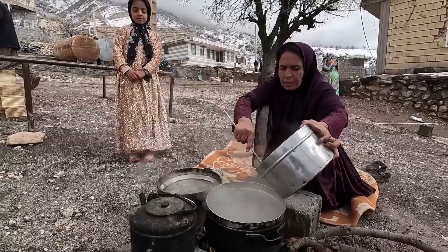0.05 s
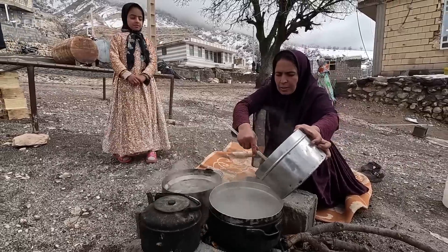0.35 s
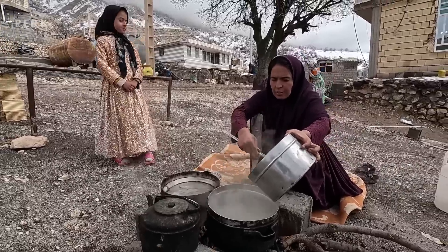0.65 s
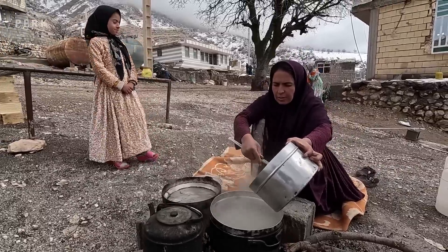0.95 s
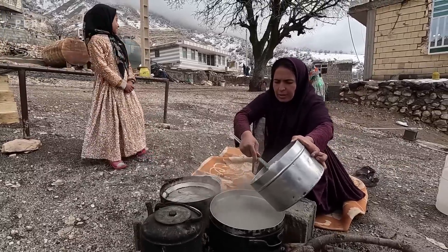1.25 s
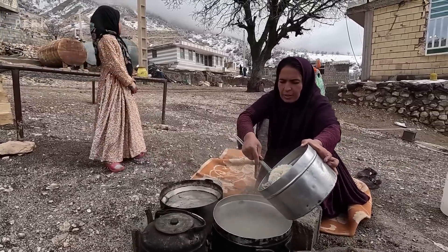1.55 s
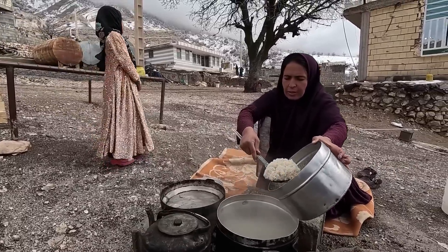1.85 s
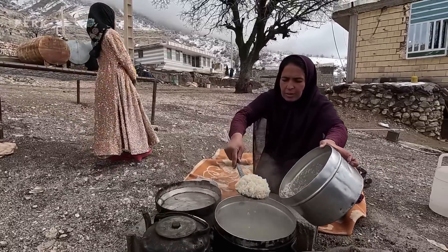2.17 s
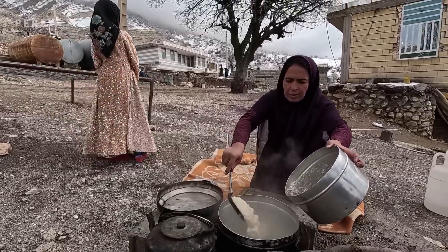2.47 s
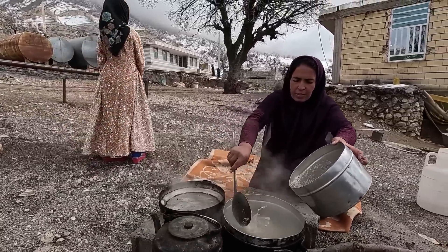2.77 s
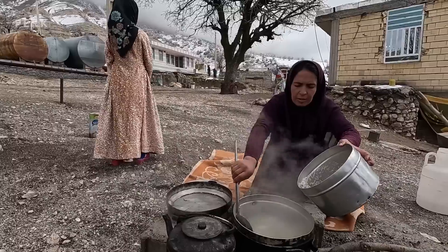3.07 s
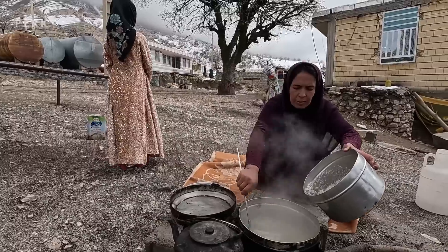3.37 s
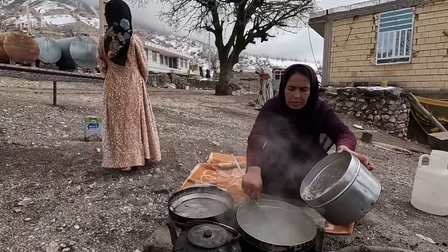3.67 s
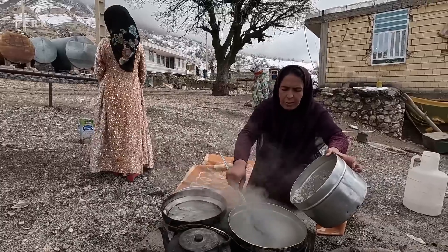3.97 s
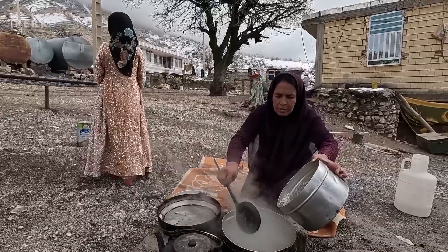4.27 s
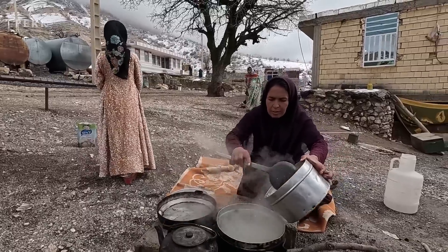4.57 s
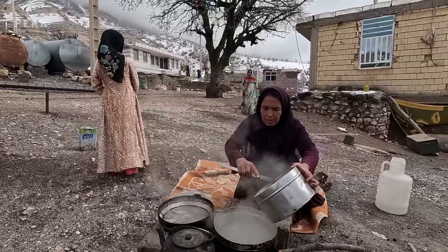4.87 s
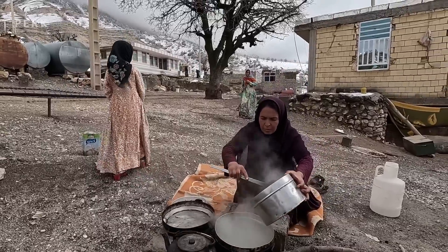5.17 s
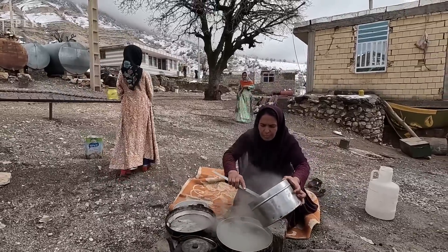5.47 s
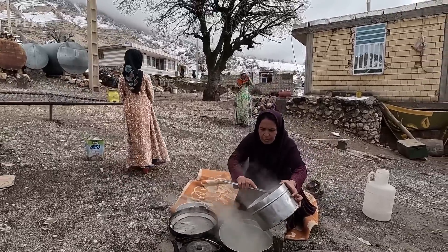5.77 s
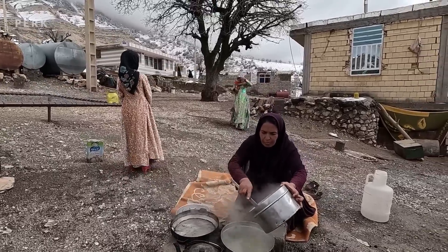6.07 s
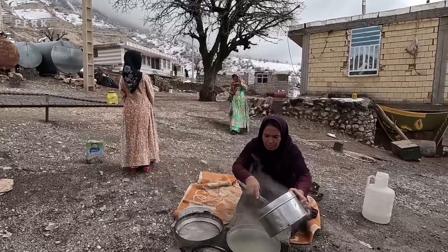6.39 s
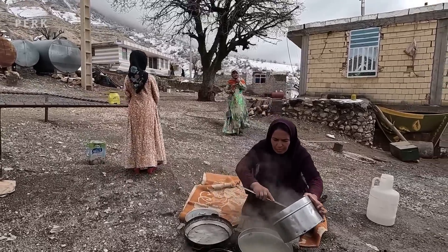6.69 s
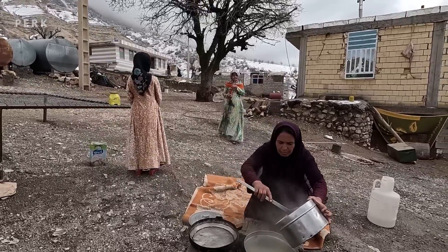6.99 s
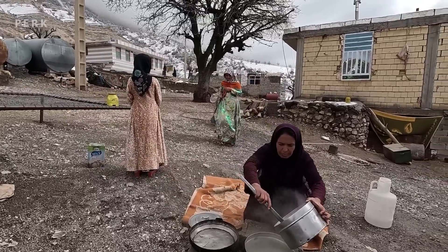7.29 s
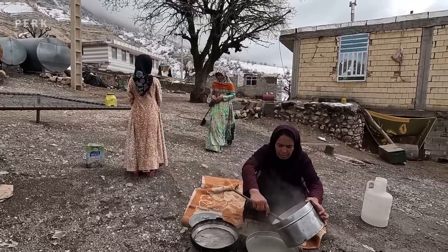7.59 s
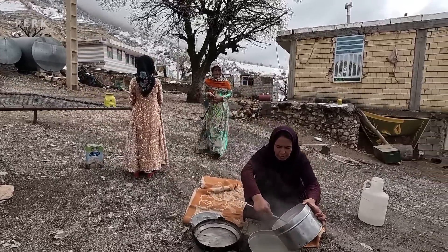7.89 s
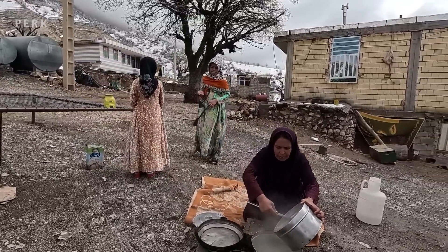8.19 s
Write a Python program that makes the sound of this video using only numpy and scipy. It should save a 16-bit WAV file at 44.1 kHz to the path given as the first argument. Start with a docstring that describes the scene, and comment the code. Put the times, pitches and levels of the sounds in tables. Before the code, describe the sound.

Outdoor cooking with gusty wind rumble: a ladle scraping and clanking in a metal pot, soft simmering, faint fire snaps and a distant goat.

```python
"""Cooking in a village yard. From the start a metal ladle scrapes a hand-held aluminium pot by stick-slip,
a cauldron simmers over a crackling wood fire, and wind rumbles on the microphone. Wet lumps plop and
steam sizzles; at 2.5 s rice slides hissing into the cauldron. At 2.7 s a goat bleats some way off and
the ladle starts to knock. Gusts peak at 3.5-4.2 s. Hard knocks and more scraping follow from 4.8 s,
and the goat bleats again at 8.1 s."""
import sys
import numpy as np
from scipy import signal
from scipy.fft import rfft, irfft, next_fast_len
from scipy.io import wavfile
from scipy.ndimage import uniform_filter1d, map_coordinates

SR = 44100
rng = np.random.default_rng(int(sys.argv[2]) if len(sys.argv) > 2 else 0)


def wav_out(sig):
    """Save sig, one row per channel (or a flat mono array), as 16-bit PCM at SR to the path in sys.argv[1]."""
    wavfile.write(sys.argv[1], SR, np.round(np.clip(np.atleast_2d(sig).T, -1, 1) * 32767).astype(np.int16))


N = 372204
TIME = np.arange(N) / SR

# ladle pressure, one curve per stroke: t/s, bottom/dB, wall/dB
LADLE_STROKES = [
    [(0.0, -34, -30), (0.04, -38.5, -30.5), (0.1, -34, -34), (0.156, -41, -38.5), (0.215, -33.5, -36.5),
     (0.265, -39, -44.5), (0.334, -40, -54), (0.35, -42, -52)],
    [(0.35, -40, -52), (0.44, -39.5, -51.5), (0.484, -31, -44), (0.506, -35, -40), (0.602, -36, -40.5),
     (0.622, -40, -43.5), (0.7, -44.5, -52), (0.92, -56, -66)],
    [(5.998, -54, -45), (6.053, -35.5, -34), (6.085, -51, -38.5), (6.099, -34, -32.5), (6.231, -39, -31),
     (6.265, -44, -40.5), (6.28, -56, -57), (6.32, -57, -49.5)],
    [(6.64, -31, -32.5), (6.682, -46, -31.5), (6.715, -44, -31), (6.75, -35, -36), (6.79, -24, -36.5),
     (6.814, -21.5, -29.5), (6.836, -31, -38.5), (6.868, -20, -35.5), (6.89, -51, -39), (6.93, -47, -60)],
    [(7.25, -34.5, -38), (7.368, -37.5, -29), (7.428, -42, -46), (7.604, -34, -41), (7.682, -36, -40.5),
     (7.788, -40.5, -51), (7.81, -55, -72)],
    [(7.81, -49.5, -62.5), (7.94, -37.5, -42), (7.99, -41.5, -58), (8.082, -44, -61), (8.106, -50, -42),
     (8.2, -50, -83)],
]
# short even flicks: t/s, length/s, bottom/dB, wall/dB
LADLE_FLICKS = [(4.948, 0.075, -31, -34), (5.055, 0.02, -20, -32.5), (5.461, 0.093, -36.5, -42.5),
                (5.543, 0.069, -29.5, -36)]
# edge catching on the wall: t/s, length/s, level/dB
EDGE_CATCHES = [(0.026, 0.033, -30.5), (0.058, 0.021, -33.5), (6.61, 0.016, -36), (6.665, 0.01, -29.5),
                (6.685, 0.0059, -27), (6.725, 0.0045, -30), (6.734, 0.013, -26.5), (6.777, 0.003, -25.5)]
# pot tones, shifting with ladle place and pressure: t/s, bottom/Hz, hollow/Hz, lowest wall mode/Hz
POT_TONES = [(0, 470, 1005, 1497), (0.348, 490, 900, 1300), (.56, 506, 966, 1405), (5.001, 525, 1000, 1402),
             (6.24, 476, 1065, 1531), (6.681, 518, 961, 1596), (6.869, 535, 1056, 1412),
             (7.35, 520.4, 1020, 1434), (7.62, 500, 926, 1532), (7.948, 478.5, 1170, 1458)]
# thin wall, damped by hand and rice: f/Hz, width/Hz, level/dB
WALL_MODES = [(1440, 103, 1.5), (1648, 220, 2.5), (1910, 500, 1), (2476, 300, 0), (2887, 400, -2.5),
              (3540, 1140, -10.5)]
# gritty treble of the wall: f/Hz, width/Hz, level/dB
GRIT_MODES = [(4150, 770, 0.5), (4810, 710, 3.5), (5440, 400, 4), (6550, 1030, 0), (7610, 890, -2),
              (9650, 1420, -9)]
# pot at the two microphone ports: f/Hz, left-right/dB
POT_PAN = [(500, -0.88), (1500, -2.1), (4200, -1.7), (12000, 1.5)]
# phase between the ports: f/Hz, left lead/rad
POT_LEAD = [(400, 0.053), (1600, -0.3), (3200, -0.81), (5500, -0.5), (12000, -0.52)]

# steady cauldron hiss: t/s, level/dB
SIMMER_LEVEL = [(0, -58), (3, -67), (4.5, -66.5), (5.35, -65.5), (5.84, -56.5), (6.4, -66), (7.1, -82),
                (8.44, -52)]
# hiss swells as rice is dug out or stirred in: centre/s, length/s, level/dB
STIR_SWELLS = [(1.298, 0.32, -52.5), (2.02, 0.28, -55.5), (3.46, 0.5, -59), (4.02, 0.0082, -51),
               (4.117, 0.16, -59), (4.159, 0.022, -43.5), (5.12, 0.15, -54.5), (6.966, 0.28, -58.5),
               (8.376, 0.49, -71)]
# fizz of tiny bubbles: f/Hz, level/dB
FIZZ_SPECTRUM = [(400, -13), (800, -1), (1300, 5), (2200, 3), (4000, -1), (7500, -1), (11500, -12),
                 (15000, -45)]
# quiet yard: f/Hz, level/dB
YARD_SPECTRUM = [(30, 18.5), (150, 15.5), (300, 6), (550, 7), (820, -6), (1300, 5.5), (2200, -0.5),
                 (4000, -10.5), (7500, -66)]

# steady wind: t/s, rumble/dB
WIND_LEVEL = [(0, -45), (.42, -47), (.55, -38.5), (1.5, -34.5), (1.75, -32), (2.1, -38.5), (2.9, -36.5),
              (3.38, -33.5), (3.65, -26.5), (4.15, -24.5), (4.55, -37.5), (5.4, -36), (5.8, -47),
              (6.55, -56), (6.7, -47), (7.2, -43.5), (7.7, -41.5), (8.44, -35)]
# single gusts: centre/s, length/s, rumble/dB, buffet/dB
WIND_GUSTS = [(0.546, 0.083, -29.5, -65), (0.742, 0.015, -24, -46.5), (1.125, 0.042, -33.5, -41.5),
              (1.72, 0.063, -25, -60), (2.248, 0.12, -29, -68), (3.048, 0.033, -21, -37.5),
              (3.471, 0.037, -18.5, -23.5), (3.613, 0.013, -15.5, -16), (3.758, 0.17, -23.5, -25),
              (4.087, 0.13, -23, -23), (4.3, 0.072, -22.5, -31.5), (4.706, 0.0099, -14.5, -57),
              (4.753, 0.021, -18.5, -31), (6.806, 0.27, -41.5, -45.5), (8.075, 0.028, -25, -34),
              (8.363, 0.046, -21.5, -32)]
# sudden slaps of wind: t/s, level/dB
WIND_SLAPS = [(3.462, -22), (3.619, -27.5), (3.696, -17.5), (3.811, -21), (4.127, -26)]
# windward side: t/s, left-right/dB
WIND_PAN = [(0, -1), (.6, -6.5), (1.15, 3.5), (1.7, -5), (3.05, -3), (3.5, -9), (5.3, -3.5), (7.5, 0.5),
            (8.4, -6.5)]
# deep wind rumble: f/Hz, level/dB
RUMBLE_SPECTRUM = [(12, -5), (28, 9.5), (55, 2), (95, -1.5), (130, -11), (200, -17.5), (400, -105)]
# buffeting above the rumble: f/Hz, level/dB
BUFFET_SPECTRUM = [(60, -61), (110, 2), (160, 0.5), (250, -5.5), (400, -18), (600, -26.5), (900, -52),
                   (2000, -68), (5000, -99)]

# fire snaps and small taps: t/s, mid/dB, treble/dB
FIRE_SNAPS = [(0.454, -53.5, -66), (1.328, -55.5, -60.5), (1.399, -59, -66), (1.606, -59.5, -70),
              (1.772, -57, -54), (2.276, -69, -65), (2.355, -50.5, -50), (2.414, -56.5, -49),
              (2.824, -55, -51), (2.937, -52, -54.5), (3.06, -49, -57), (3.8, -56, -61.5),
              (4.012, -56.5, -75), (4.27, -67, -61.5), (4.371, -67, -71), (5.282, -57, -59),
              (5.785, -59.5, -74), (7.072, -57, -69)]
# wet lumps landing: t/s, f/Hz, level/dB
LUMP_PLOPS = [(.717, 1440, -42), (1.132, 1150, -48), (1.284, 3500, -48), (2.564, 2180, -43.5),
              (2.601, 550, -44), (2.673, 2150, -42.5), (2.832, 710, -46.5), (3.056, 613, -40.5),
              (5.235, 530, -49)]
# steam jets: centre/s, length/s, f/Hz, level/dB
STEAM_JETS = [(0.854, 0.047, 7700, -53.5), (3.213, 0.054, 8800, -59)]
# rice sliding into the cauldron: t/s, level/dB
RICE_LEVEL = [(2.49, -51), (2.51, -44), (2.58, -45), (2.66, -41.5), (2.75, -46), (2.805, -40), (2.84, -51),
              (2.9, -51), (2.96, -75)]
# patter of wet grains: f/Hz, level/dB
RICE_SPECTRUM = [(300, 2), (900, 2.5), (2200, 3.5), (6500, 5.5), (9500, -0.5), (12500, -9), (15000, -31)]

# one curve per bleat: t/s, pitch/Hz, level/dB, roughness/0-1, low formant lift/dB, high formant lift/dB
GOAT_BLEATS = [
    [(2.68, 150.1, -50.5, 0.42, -4, -2), (2.78, 159.2, -41, 0.56, -4, -3.5),
     (2.86, 165, -43.5, 0.3, 4.5, -4), (2.94, 168.2, -43.5, 0.05, 1, 0),
     (3.04, 170.2, -43.5, 0.23, -4, 2.5), (3.12, 170.2, -40.5, 0.32, -7, -5),
     (3.36, 168.9, -41, 0.34, 5.5, -12), (3.43, 168, -41, 0.7, 1, -6), (3.52, 165.5, -38, 0.67, 3, 0.5),
     (3.61, 163.5, -39.5, 0.86, 4, -2), (3.69, 158, -49.5, 0.46, 3, 1), (3.9, 139.3, -57, 0.49, 6, -3)],
    [(8.13, 159.3, -47, 0.85, -7, -3), (8.22, 165.5, -45, 0.65, 4, -6), (8.3, 171.4, -47.5, 0.32, 10, -1),
     (8.44, 169.8, -43, 0.3, 2, -7)],
]
# throat response: f/Hz, level/dB
THROAT_SPECTRUM = [(170, 4), (340, -5), (510, 3), (600, 12), (680, 6), (850, -29), (1150, -4), (1350, -1),
                   (1520, 6.5), (1680, 17), (1750, 7), (1900, 4.5), (2200, 2.5), (2400, 3.5), (2550, 1),
                   (2850, -6.5), (3500, -20)]
# main throat resonances, lifted as the mouth works: f/Hz, width/Hz
THROAT_FORMANTS = [(640, 180), (1690, 410)]
# hoarse breath: f/Hz, level/dB
RASP_SPECTRUM = [(350, -14), (600, 26.5), (900, 14.5), (1350, 28), (1700, 4), (2300, 6), (2900, 16),
                 (3800, 15), (6000, -35)]

# ladle blows: t/s, bottom/dB, hollow/dB, wall/dB, clank/Hz
LADLE_KNOCKS = [(2.781, -39, -42.5, -29, 2000), (2.879, -43.5, -43, -36.5, 1750),
                (3.282, -39, -34, -31, 1450), (4.834, -33.5, -46, -25, 1950),
                (4.845, -26, -38, -23.5, 2040), (4.904, -25, -29.5, -31.5, 1510),
                (5.026, -26, -30, -41, 2070), (5.057, -36, -24.5, -32.5, 1800),
                (5.077, -25, -27, -46.5, 1790), (5.111, -30, -36, -40, 1820),
                (5.42, -32.5, -41, -25.5, 1840), (5.474, -20.5, -19, -23.5, 1680),
                (5.935, -43.5, -43, -28, 1800), (5.973, -19, -31, -36.5, 1680),
                (6.541, -36, -39, -24.5, 1990), (6.589, -23.5, -27.5, -30.5, 2480),
                (6.632, -31.5, -27.5, -32.5, 1450), (6.703, -24, -43, -26.5, 2000),
                (6.785, -23.5, -23, -38, 2020), (6.844, -27, -24, -34, 1970),
                (7.231, -31.5, -43, -24, 1810), (7.771, -46, -39, -43, 1900)]
# free rim, ringing after a blow: f/Hz, width/Hz, level/dB
RIM_MODES = [(1900, 28, -11), (2939, 16, -5), (3270, 16, 2)]

BOTTOM_WIDTH_HZ, HOLLOW_WIDTH_HZ = 119, 224
TOUCH_DB = -31.5  # ordinary ladle pressure


def from_db(db):
    """Decibels to gain."""
    return 10 ** (np.asarray(db) / 20)


def unit_rms(x):
    """Scale to unit power."""
    return x / np.sqrt(np.mean(x ** 2) + 1e-20)


def unit_energy(x):
    """Scale to unit energy."""
    return x / np.sqrt(np.sum(x ** 2) + 1e-20)


def in_time(rows):
    """Columns of a curve, per sample."""
    times, *columns = np.transpose(rows)
    return [np.interp(TIME, times, column) for column in columns]


def during(rows, fade_s):
    """Ramped gate over the span of a curve."""
    return np.clip(np.minimum(TIME - rows[0][0], rows[-1][0] - TIME) / fade_s + .5, 0, 1)


def swell(centre_s, length_s):
    """Bell envelope; length is the half-power width."""
    return 2 ** (-2 * ((TIME - centre_s) / length_s) ** 2)


def burst(t, length_s, attack_s, release_s):
    """Attack, hold, release."""
    return np.clip(t / attack_s, 0, 1) * np.exp(-np.clip(t - length_s, 0, 1) / release_s)


def add(track, start_s, sound):
    """Mix a sound into a track."""
    i = max(round(start_s * SR), 0)
    track[i:i + len(sound)] += sound[:N - i]


def noise(size=N):
    """White noise."""
    return rng.standard_normal(size)


def drift(rate_hz):
    """Slow random motion, unit RMS."""
    hop, settle = 40, 2000
    r = np.exp(-2 * np.pi * rate_hz * hop / SR)
    slow = signal.lfilter([1], [1, -2 * r, r * r], noise(N // hop + settle + 2))[settle:]
    return np.interp(np.arange(N) / hop, np.arange(len(slow)), unit_rms(slow))


def grains(per_s, spread_db):
    """Random clicks of uneven size."""
    sizes = from_db(spread_db * np.minimum(rng.exponential(1, N), 4)) * rng.choice([-1, 1], N)
    return sizes * (rng.random(N) < per_s / SR)


def stereo(draw, correlation):
    """Two partly correlated channels."""
    mid = np.sqrt((1 + correlation) / 2) * draw()
    side = np.sqrt((1 - correlation) / 2) * draw()
    return np.array([mid + side, mid - side])


def at_hz(spectrum, hz):
    """Interpolate on a log-frequency axis."""
    points_hz, values = np.transpose(spectrum)
    return np.interp(np.log(np.maximum(hz, 1)), np.log(points_hz), values)


def colour(x, spectrum):
    """Apply a spectrum; unit RMS."""
    size = next_fast_len(N)
    gain = from_db(at_hz(spectrum, np.fft.rfftfreq(size, 1 / SR)))
    return unit_rms(irfft(rfft(x, size) * gain, size)[..., :N])


def patchy(x, depth_db, rate_hz):
    """Each octave fades in and out on its own; unit RMS."""
    size, octaves_hz = next_fast_len(N), 375 * 2 ** np.arange(7)
    hz, spectrum = np.fft.rfftfreq(size, 1 / SR), rfft(x, size)
    out = 0
    for row in np.eye(len(octaves_hz)):
        share = np.interp(np.log(hz + 1), np.log(octaves_hz), row)
        out += irfft(spectrum * share, size)[..., :N] * from_db(depth_db * drift(rate_hz))
    return unit_rms(out)


def band(x, low_hz, high_hz, order=2):
    """Causal band-pass."""
    sos = signal.butter(order, [low_hz, high_hz], "band", fs=SR, output="sos")
    return signal.sosfilt(sos, x + 1e-18)


def resonance(x, hz, width_hz):
    """Steep resonance; the centre may move."""
    carrier = np.exp(2j * np.pi * np.cumsum(hz * np.ones(len(x))) / SR)
    r = np.exp(-np.pi * width_hz / SR)
    return np.real(carrier * signal.lfilter([(1 - r) ** 2], [1, -2 * r, r * r], x / carrier + 1e-18))


def modes(x, table):
    """Parallel modes of alternating sign."""
    out = 0
    for k, (hz, width_hz, db) in enumerate(table):
        r = np.exp(-np.pi * width_hz / SR)
        gain = (-1) ** k * from_db(db) * (1 - r * r) / 2
        poles = [1, -2 * r * np.cos(2 * np.pi * hz / SR), r * r]
        out += gain * signal.lfilter([1, 0, -1], poles, x + 1e-18)
    return out


def pot_voices(bowl_force, edge_force, bottom_hz, hollow_hz, wall_hz):
    """The ladle's bowl drives bottom and hollow; its edge drives wall and grit."""
    bottom = resonance(bowl_force, bottom_hz, BOTTOM_WIDTH_HZ)
    hollow = resonance(bowl_force, hollow_hz, HOLLOW_WIDTH_HZ)
    wall = band(modes(edge_force, WALL_MODES), 1260, 5400)
    read_at = np.cumsum(wall_hz * np.ones(len(wall)) / WALL_MODES[0][0])  # retune by resampling
    wall = map_coordinates(wall, [read_at], order=1, mode="mirror")
    grit = band(modes(edge_force, GRIT_MODES), 2500, 12800)
    return bottom, hollow, wall, grit


def grit_db(wall_db):
    """Grit grows faster than the pressure on the wall."""
    return TOUCH_DB - 8.5 + 1.22 * (wall_db - TOUCH_DB)


def ladle_pressure_db():
    """Strokes, flicks and catches bearing on bottom and wall."""
    gain = sum(during(stroke, 0.0037) * from_db(in_time(stroke)) for stroke in LADLE_STROKES)
    for start_s, length_s, *db in LADLE_FLICKS:
        gain += from_db(db)[:, None] * burst(TIME - start_s, length_s, attack_s=0.025, release_s=0.008)
    catches = np.zeros(N)
    for start_s, length_s, db in EDGE_CATCHES:
        envelope = burst(TIME[:SR // 10], length_s, attack_s=0.00039, release_s=0.004)
        add(catches, start_s, from_db(db) * envelope)
    return 20 * np.log10(np.array([gain[0], np.hypot(gain[1], catches)]) + 1e-9)


def stick_slip(judder_hz=109.9, depth_db=7):
    """Each slip jerks, then decays until the edge catches again, at an uneven rate."""
    cycles = np.cumsum(judder_hz * from_db(3 * drift(40))) / SR
    return from_db(-depth_db * (cycles % 1))


def bending_waves(force, lap_s=.0042, travel=0.1065, return_gain=0.4):
    """Waves circle the wall and return; the paths change as the ladle moves."""
    out = force
    for share in 1, .618, .382:
        delay = lap_s * share * SR * (1 + travel * drift(2.59))
        out = out + return_gain * map_coordinates(out, [np.arange(N) - delay], order=1)
    return out


def scraping(wander=.04, flicker_db=2.5, trims_db=(-.5, -1, -.5, -1)):
    """The bowl rubs the bottom, the edge slips along the wall; the tones glide with the ladle."""
    bottom_db, wall_db = ladle_pressure_db()
    drive_db = 0.63 * bottom_db + 0.37 * wall_db
    hollow_db = TOUCH_DB - 2 + 1.1 * (drive_db - TOUCH_DB)
    levels_db = bottom_db, hollow_db, wall_db, grit_db(wall_db)
    tones_hz = [hz * (1 + wander * drift(6)) for hz in in_time(POT_TONES)]
    jerks = stick_slip()
    bowl, edge = (jerks * grains(per_s=1300, spread_db=2) for _ in range(2))
    voices = pot_voices(bowl, bending_waves(edge), *tones_hz)
    out = 0
    for voice, db, trim_db in zip(voices, levels_db, trims_db):
        steady = voice / np.sqrt(uniform_filter1d(voice ** 2, size=900) + 1e-12)  # even hand pressure
        out += steady * from_db(db + trim_db + flicker_db * drift(16.8))
    return out


def place_pot(x):
    """Close by, slightly right: level and phase differ between the ports."""
    size = next_fast_len(N + SR // 10)
    hz = np.fft.rfftfreq(size, 1 / SR)
    left = from_db(at_hz(POT_PAN, hz) / 2) * np.exp(.5j * at_hz(POT_LEAD, hz))
    return irfft(rfft(x, size) * np.array([left, 1 / left]), size)[:, :N]


def yard_echo(x, t60_s, first_s=0.01):
    """Sparse, dull scatter off stone walls and ground, different per channel."""
    t = TIME[:SR // 2]
    reflections = noise((2, len(t))) * (rng.random((2, len(t))) < .03) * (t > first_s)
    response = band(reflections * from_db(-60 * t / t60_s), 630, 3000, order=1)
    return signal.fftconvolve(x[None], np.sqrt(2) * unit_energy(response), axes=1)[:, :N]


def bubbles(per_s, low_hz, high_hz, cycles):
    """Random bursts, each ringing a few cycles at one of 12 pitches."""
    bursts, pitch_index = grains(per_s, 5), rng.integers(0, 12, N)
    return unit_rms(sum(modes(bursts * (pitch_index == k), [(hz, hz / cycles, 0)])
                        for k, hz in enumerate(np.geomspace(low_hz, high_hz, 12))))


def simmering(pops_db=-9, rustle_db=-0.5, ticks_db=-67.5):
    """Tiny bubbles hiss and pop, sticky clumps rustle; fire and stirring tick faintly."""
    stir_power = sum((from_db(db) * swell(centre_s, length_s)) ** 2
                     for centre_s, length_s, db in STIR_SWELLS)
    gain = np.sqrt(from_db(in_time(SIMMER_LEVEL)[0]) ** 2 + stir_power)
    fizz = colour(stereo(lambda: grains(12000, 2.5), .6), FIZZ_SPECTRUM)
    fizz = patchy(fizz, depth_db=1.7, rate_hz=14)
    pops = bubbles(130, 1100, 3600, cycles=6)
    ticks = band(bubbles(45, 1500, 7000, cycles=5), 1000, 7500)
    clumps = grains(2500, 3) * from_db(2.5 * drift(40))
    rustle = patchy(band(clumps, 1400, 6000), depth_db=3.5, rate_hz=25)
    cauldron = fizz + from_db(pops_db) * pops + from_db(rustle_db) * rustle
    return gain * cauldron + from_db(ticks_db) * ticks


def yard_air(level_db=-55.5):
    """Steady low background of the yard."""
    return from_db(level_db) * colour(stereo(noise, 0.58), YARD_SPECTRUM)


def wind_gains(breeze_db=-36, buffet_offset_db=-14.5):
    """Rumble and buffet gains, gusts included; buffeting catches up above a breeze."""
    rumble_db, = in_time(WIND_LEVEL)
    buffet_db = rumble_db + buffet_offset_db + np.maximum(rumble_db - breeze_db, 0)
    power = from_db([rumble_db, buffet_db]) ** 2
    for centre_s, length_s, *db in WIND_GUSTS:
        power += (from_db(db)[:, None] * swell(centre_s, length_s)) ** 2
    return np.sqrt(power)


def wind(slap_decay_s=0.01):
    """Eddies hit the ports in lumps, mostly on one side; the hardest slap."""
    lumps = unit_rms(from_db(5 * np.tanh(.8 * drift(22))))
    out = 0
    for spectrum, gain in zip((RUMBLE_SPECTRUM, BUFFET_SPECTRUM), wind_gains()):
        eddies = colour(stereo(noise, 0.91), spectrum)
        local_rms = np.sqrt(uniform_filter1d(np.mean(eddies ** 2, axis=0), size=3500))
        out += gain * lumps * eddies / local_rms
    slap_envelope = np.zeros(N)
    for start_s, db in WIND_SLAPS:
        add(slap_envelope, start_s, from_db(db) * np.exp(-TIME[:SR // 8] / slap_decay_s))
    slaps = slap_envelope * unit_rms(band(noise(), 183, 480, order=3))
    out += band(slaps, 79, 910)  # soft air has no click
    pan_db, = in_time(WIND_PAN)
    sides = from_db([pan_db / 2, -pan_db / 2])
    return out * sides / np.mean(sides, axis=0)


def snapping(crack_s=0.003, tail_s=0.018, tail_db=-23, level_window_s=0.14):
    """Dry fire cracks and taps, hardly ringing."""
    out, t = np.zeros(N), TIME[:SR // 16]
    envelope = np.exp(-t / crack_s) + from_db(tail_db) * np.exp(-t / tail_s)
    for start_s, mid_db, treble_db in FIRE_SNAPS:
        crack = noise(len(t)) * envelope
        mid = from_db(mid_db) * unit_energy(band(crack, 1320, 3070))
        treble = from_db(treble_db) * unit_energy(band(crack, 4250, 7630, order=3))
        add(out, start_s, (mid + treble) * np.sqrt(level_window_s * SR))
    return out


def plopping(length_s=0.0017, attack_s=0.0011, release_s=0.011):
    """Each wet lump traps an air pocket that rings briefly and dully."""
    out, t = np.zeros(N), TIME[:SR // 16]
    for start_s, hz, db in LUMP_PLOPS:
        impact = noise(len(t)) * burst(t, length_s, attack_s, release_s)
        pocket = unit_energy(resonance(impact, hz, width_hz=0.47 * hz))
        add(out, start_s, from_db(db) * pocket * np.sqrt((length_s + release_s) * SR))
    return out


def sizzling(width_hz=1800):
    """Narrow steam jets hiss briefly."""
    return sum(from_db(db) * swell(centre_s, length_s) * unit_rms(resonance(noise(), hz, width_hz))
               for centre_s, length_s, hz, db in STEAM_JETS)


def sliding_rice(froth_db=-4, lumps_db=3):
    """Wet grains fizz on landing and drag small bubbles under."""
    level_db, = in_time(RICE_LEVEL)
    patter = colour(stereo(lambda: grains(14000, 2.5), 0.8), RICE_SPECTRUM)
    froth = from_db(froth_db) * bubbles(1500, 1800, 8000, cycles=7)
    gain = during(RICE_LEVEL, .01) * from_db(level_db + lumps_db * drift(32))
    return gain * unit_rms(patter + froth)


def goat(wobble=0.0034, jitter=0.025, flicker_db=2):
    """Throat buzz under swelling formants; roughness breaks it into a rasp, weak overtones first."""
    pitch_hz, level_db, rough, *lifts_db = in_time([row for bleat in GOAT_BLEATS for row in bleat])
    waver = 1 + wobble * drift(15.4) + jitter * rough ** 2 * drift(57.5)
    phase = 2 * np.pi * np.cumsum(pitch_hz * waver) / SR
    gate = sum(during(bleat, 0.015) for bleat in GOAT_BLEATS)
    live, buzz = gate > 0, np.zeros(N)
    for k in range(1, 21):
        hz = k * pitch_hz[live]
        nearness = [2 ** -((2 * (hz - centre_hz) / width_hz) ** 2)
                    for centre_hz, width_hz in THROAT_FORMANTS]
        lift_db = sum(db[live] * near for db, near in zip(lifts_db, nearness))
        blur_rad = (.1 + 1.3 * rough[live] ** 2) * (1 - .7 * sum(nearness)) * drift(45)[live]
        flutter_db = flicker_db * (1 - .5 * sum(nearness)) * drift(14)[live]
        gain = from_db(at_hz(THROAT_SPECTRUM, hz) + lift_db + flutter_db)
        buzz[live] += gain * np.cos(k * phase[live] + blur_rad + 2 * np.pi * rng.random())
    buzz[live] = 0.9 * unit_rms(buzz[live])
    breath = colour(noise(), RASP_SPECTRUM) * (1 + np.cos(phase)) * from_db(3 * drift(45))
    shimmer = 1 + (.1 + .5 * rough) * drift(60)
    voice = buzz * shimmer + (.06 + .55 * rough ** 2) * breath
    return gate * from_db(level_db) * voice / (1 + rough ** 2)


def knocking(contacts_per_s=4000, chatter_s=0.0042, tail_s=0.03, tail_db=-29, level_window_s=0.009):
    """Each blow is a cluster of metal contacts: the bottom thumps, the wall clanks, the rim rings on."""
    out, t = np.zeros(N), TIME[:SR // 6]
    envelope = np.exp(-t / chatter_s) + from_db(tail_db) * np.exp(-t / tail_s)
    times, *tones_hz = np.transpose(POT_TONES)
    for start_s, bottom_db, hollow_db, wall_db, clank_hz in LADLE_KNOCKS:
        contacts = noise(len(t)) * (rng.random(len(t)) < contacts_per_s / SR)
        contacts[0] = 2
        force = contacts * envelope
        struck_hz = [np.interp(start_s, times, hz) * (1 + .025 * rng.normal()) for hz in tones_hz]
        bottom, hollow, wall, grit = pot_voices(force, force, *struck_hz)
        low_tone = from_db(-9.5) * unit_energy(resonance(force, 0.796 * struck_hz[0], BOTTOM_WIDTH_HZ))
        clank = from_db(-2.5) * unit_energy(resonance(force, clank_hz, width_hz=175))
        rim = from_db(-15) * unit_energy(modes(force, RIM_MODES))
        bottom = band(unit_energy(bottom) + low_tone, 296, 576, order=3)
        hollow = band(hollow, 720, 1430)
        wall = unit_energy(band(wall, 1750, 8200)) + clank + rim
        voices = (bottom, bottom_db), (hollow, hollow_db), (wall, wall_db), (grit, grit_db(wall_db))
        blow = sum(from_db(db) * unit_energy(voice) for voice, db in voices)
        add(out, start_s + 0.000986, blow * np.sqrt(level_window_s * SR))
    return out


def scene():
    """Pot and fire in front, goat beyond, wind over all."""
    near = scraping() + knocking() + snapping() + plopping()
    front = place_pot(near) + from_db(-24.5) * yard_echo(near, t60_s=0.17)
    bleat = goat()
    far = bleat * from_db([[-.5], [.5]]) + from_db(-11) * yard_echo(bleat, t60_s=.4)
    return front + simmering() + yard_air() + wind() + sizzling() + sliding_rice() + far


def record(dry):
    """Steep low-pass at 15.3 kHz."""
    return signal.sosfilt(signal.ellip(10, .1, 80, 15300, fs=SR, output="sos"), dry)


dry = scene()
out = record(dry)
wav_out(out)
```